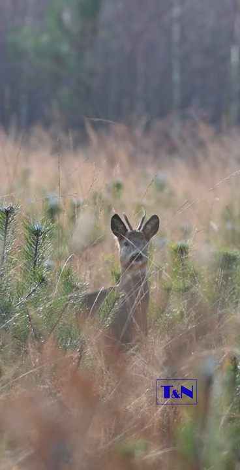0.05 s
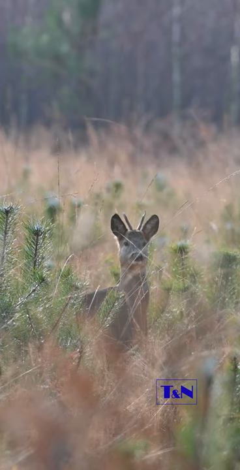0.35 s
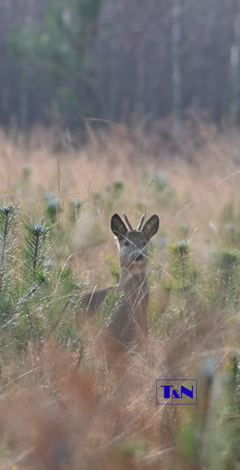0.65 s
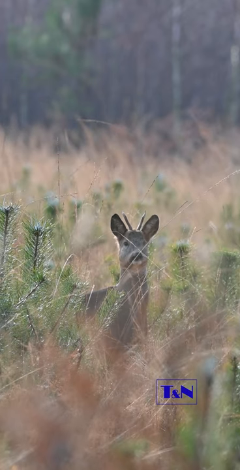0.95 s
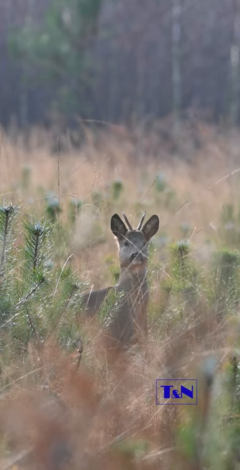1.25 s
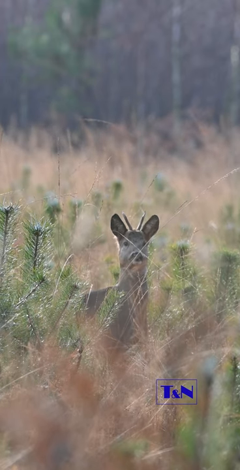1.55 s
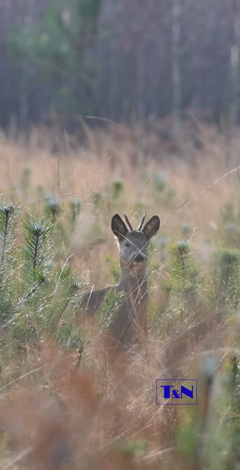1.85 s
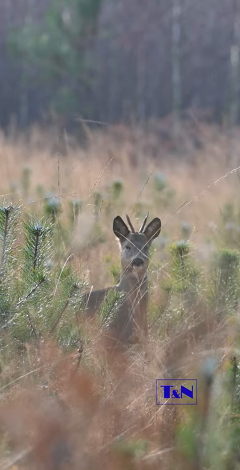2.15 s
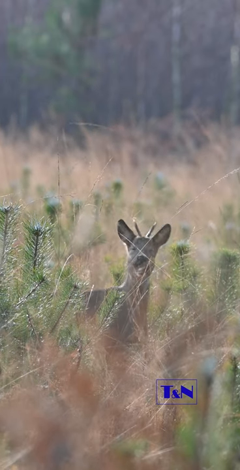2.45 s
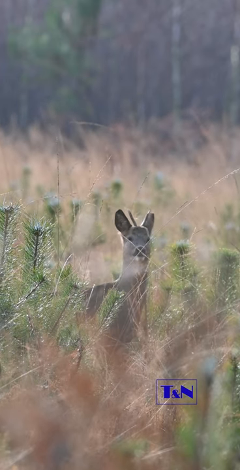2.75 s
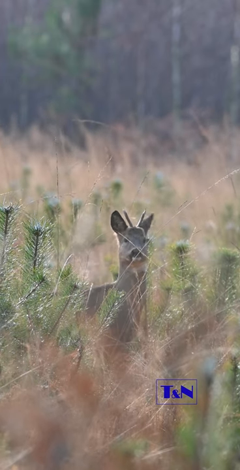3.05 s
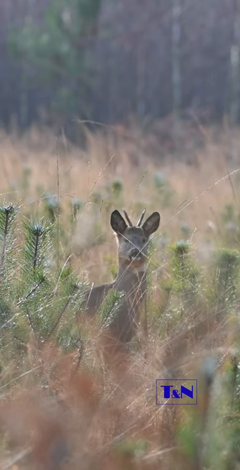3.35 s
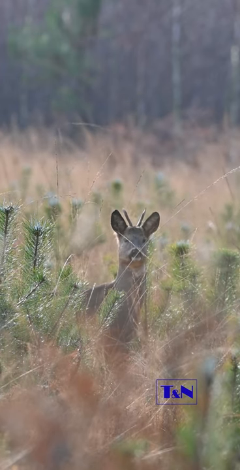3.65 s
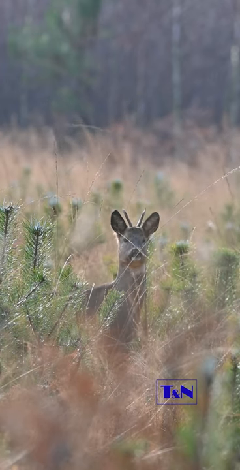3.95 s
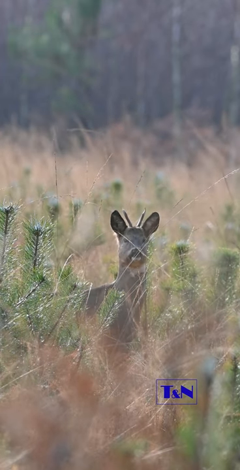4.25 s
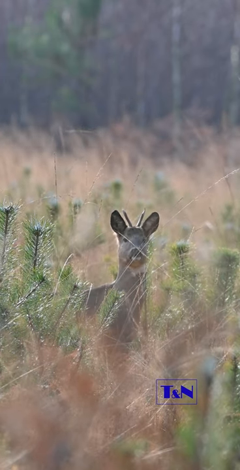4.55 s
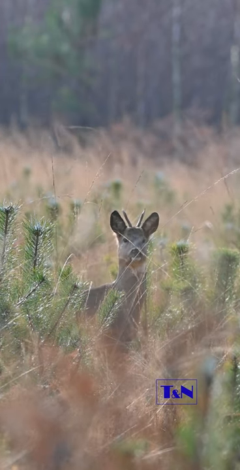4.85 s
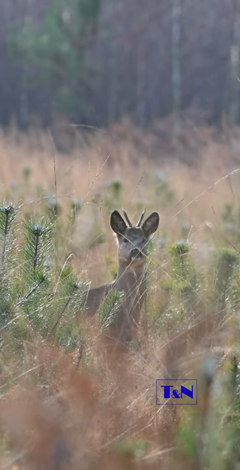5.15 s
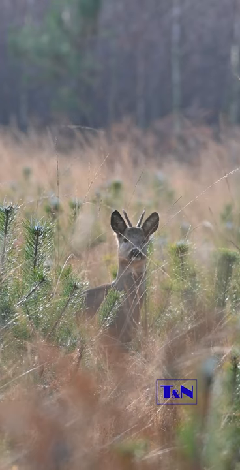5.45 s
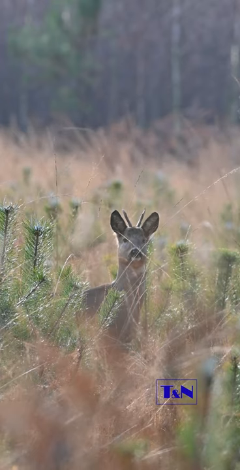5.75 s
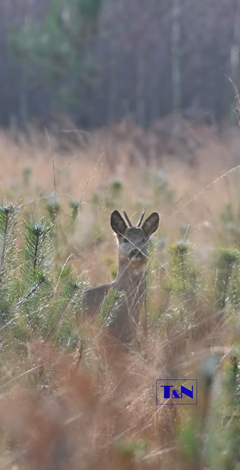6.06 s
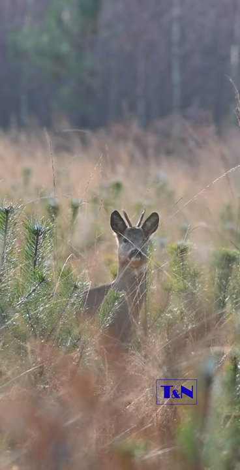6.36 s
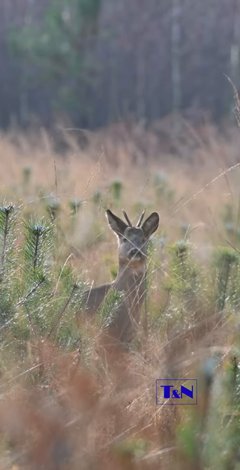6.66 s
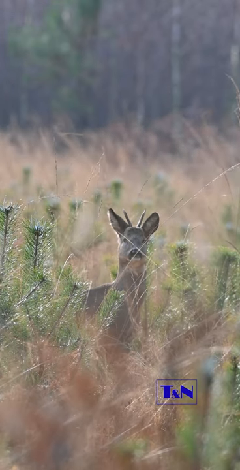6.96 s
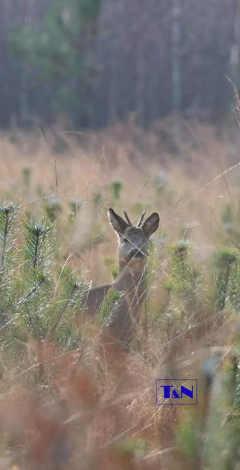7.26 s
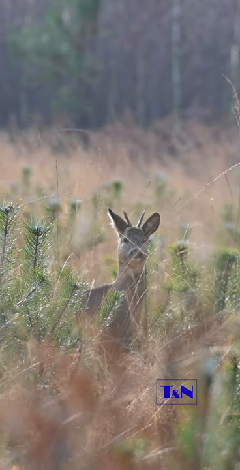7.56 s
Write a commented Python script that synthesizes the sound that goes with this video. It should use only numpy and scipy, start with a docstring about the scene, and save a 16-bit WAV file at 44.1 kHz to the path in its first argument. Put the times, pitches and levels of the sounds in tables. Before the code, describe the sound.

From the start, a quiet forest clearing is heard: a faint, distant murmur of air in the trees and a thin, even, high hiss, both continuing throughout. At about 0.7 seconds there is a tiny dry tick to the left. At 2.6 seconds a deer gives one loud, harsh bark, a hoarse rattle that bursts open, brightens towards its end and cuts off sharply at 2.9 seconds. The trees return a ringing tail, slightly to the right, with two hollow echoes about half a second and two thirds of a second behind the bark, the second weaker. The tail has faded by roughly 4 seconds. Between 4.1 and 5.9 seconds come several faint, crisp ticks, like tiny dry stems snapping, mostly on the left. Only the soft air and hiss remain until the end at about 7.5 seconds.

```python
"""Roe deer bark in a forest clearing.

One harsh rattle: the vocal folds slap unevenly and let puffs of turbulence into the throat.
Young pines scatter the bark, trunks return a long tail, the forest edge two hollow echoes.
Behind it: a distant murmur of air, a thin high hiss, a few tiny ticks."""
import sys
import numpy as np
from scipy import signal
from scipy.fft import rfft, irfft
from scipy.io import wavfile
from scipy.ndimage import uniform_filter1d

SR = 44100
rng = np.random.default_rng(int(sys.argv[2]) if len(sys.argv) > 2 else 0)


def to_wav(sig):
    """Store sig (one row per channel, or 1-D mono) as 16-bit WAV at the path in sys.argv[1].

    Samples outside -1..1 are clipped; the rate is SR.
    """
    pcm = np.clip(np.atleast_2d(sig), -1, 1) * 32767
    pcm = np.round(pcm).astype(np.int16)
    wavfile.write(sys.argv[1], SR, pcm.T)  # frames by channels


N = 339570
START_S, OPEN_S, STOP_S = 2.612, 2.637, 2.901  # bark starts, mouth opens, bark is cut off
RELEASE_DB_PER_S = 900.5


def gain_of(db):
    """Decibels to amplitude."""
    return 10 ** (np.asarray(db) / 20)


def unit_rms(x):
    """Scale to rms 1."""
    return x / np.sqrt(np.mean(x ** 2) + 1e-20)


def lookup(table, hz, column=1):
    """Interpolate a table column over log frequency."""
    columns = np.transpose(table)
    return np.interp(np.log(hz + 1), np.log(columns[0] + 1), columns[column])


def ramp(t, start_s, length_s):
    """Linear rise from 0 to 1."""
    return np.clip((t - start_s) / length_s, 0, 1)


def add(mix, start_s, sound):
    """Mix a sound in at start_s."""
    part = mix[:, round(start_s * SR):][:, :sound.shape[1]]
    part += sound[:, :part.shape[1]]


def pan(side_db):
    """Stereo gains for a left-minus-right level."""
    return gain_of(np.array([[.5], [-.5]]) * side_db)


def stereo_pair(spectra, hz, likeness):
    """Blend two independent spectra: alike in the bass, unrelated in the treble."""
    # Each row: frequency in Hz, left-right coherence at likeness 1.
    coherence = [(200, 1), (400, .99), (640, .94), (1400, .58), (2400, .05), (4000, 0)]
    shared = np.clip(likeness * lookup(coherence, hz), -1, 1)
    return np.array([spectra[0], shared * spectra[0] + np.sqrt(1 - shared ** 2) * spectra[1]])


def resonate(x, hz, width_hz):
    """Steep unity-gain resonance; hz may move."""
    carrier = np.exp(2j * np.pi * np.cumsum(hz * np.ones(len(x))) / SR)
    pole = np.exp(-np.pi * width_hz / SR)
    baseband = signal.lfilter([(1 - pole) ** 2], [1, -2 * pole, pole * pole], x / carrier + 1e-18)
    return 2 * (carrier * baseband).real


def top_treble(x, band_hz=(12350, 15780)):
    """Band-pass at the top of the treble."""
    taps = signal.firwin(401, band_hz, pass_zero=False, fs=SR)
    return signal.oaconvolve(x, taps[None], "same", axes=1)


def moving_highpass(x, t, edge_hz, order=16):
    """Steep high-pass whose edge follows a curve."""
    hz, frame_s, spectra = signal.stft(x, SR, nperseg=1024, noverlap=896)
    frame_edge_hz = np.interp(frame_s, t - t[0], edge_hz)
    spectra = spectra / np.hypot(1, (frame_edge_hz / (hz[:, None] + 1)) ** order)
    return signal.istft(spectra, SR, nperseg=1024, noverlap=896)[1][:len(x)]


def scatterers(size):
    """Sparse random reflections, about 3000 a second on each side."""
    return rng.standard_normal((2, size)) * (rng.random((2, size)) < 3000 / SR)


def air(level_db=-66.5, swell_db=-0.477):
    """Distant air in the trees, barely swelling."""
    # Each row: frequency in Hz, relative spectral density in dB.
    density = [(20, -5), (60, -4), (130, -5), (240, -1.5), (450, -1.5), (700, 0.5), (1000, -2.5),
               (1500, -11.5), (2000, -17.5), (3000, -23.5), (5000, -27), (11000, -33)]
    t, hz = np.arange(N) / SR, np.fft.rfftfreq(N, 1 / SR)
    white = stereo_pair(rfft(rng.standard_normal((2, N))), hz, likeness=1)
    murmur = irfft(white * gain_of(lookup(density, hz)), N)
    swell = sum(np.sin(2 * np.pi * (rate_hz * t + rng.random())) / np.sqrt(rate_hz)
                for rate_hz in np.geomspace(.2, 4, num=12))
    return gain_of(level_db + swell_db * unit_rms(swell)) * murmur / np.std(murmur.mean(0))


def hiss(level_db=-64.5):
    """Thin, even, high hiss."""
    return gain_of(level_db) * unit_rms(top_treble(rng.standard_normal((2, N))))


def ticks(burst_decay_s=0.00254, ring_hz=6300, ring_s=0.000488):
    """Tiny dry snaps: a bright noise burst over a short, lower ring; the first snap comes back once as a faint
    echo."""
    # Each row: start in seconds, burst gain in dB, ring gain in dB, left minus right in dB.
    snaps = [(0.7315, -39.5, -52, 11.5), (0.7487, -52.5, -74, 1.5), (4.1135, -44, -90, 3.0),
             (4.337, -43.5, -89.5, 5.5), (4.5101, -41, -92, 8), (5.222, -42, -80.5, 8),
             (5.7338, -48, -90, -0.5), (5.8167, -42.5, -65, 6), (5.8414, -46, -74, 1.0)]
    # Each row: multiple of ring_hz, relative level in dB.
    partials = [(1, 8), (1.11, 4), (1.38, -17.5), (1.86, 1)]
    t = np.arange(SR // 16) / SR
    ring = sum(gain_of(db) * np.sin(2 * np.pi * ratio * ring_hz * t) for ratio, db in partials)
    ring *= (t / ring_s) ** 2 * np.exp(-t / ring_s)
    bursts, rings = np.zeros((2, N)), np.zeros((2, N))
    for start_s, burst_db, ring_db, side_db in snaps:
        burst = rng.standard_normal((2, len(t))) * np.exp(-t / burst_decay_s)
        add(bursts, start_s, gain_of(burst_db) * pan(side_db) * burst)
        add(rings, start_s, gain_of(ring_db) * pan(side_db) * ring)
    direct = top_treble(bursts) + rings
    return direct + pines(direct, level_db=-7, decay_s=0.0218, likeness=.8)


def edge_echoes(x, side_db=-3):
    """The forest edge returns late, hollow, narrow-band echoes."""
    # Each row: delay in seconds, centre in Hz, width in Hz, gain in dB.
    echoes = [(.44, 991.6, 111, -17.5), (.67, 1535, 100, -28.5)]
    out = np.zeros((2, N))
    for delay_s, hz, width_hz, db in echoes:
        add(out, delay_s, gain_of(db) * pan(side_db) * resonate(x[0], hz, width_hz))
    return out


def forest_tail(x, build_s=0.031, knee_db=28, extra_db_per_s=130, side_db=-3, left_lag_s=0.00012):
    """Trunks on the right return a tail that swells, decays by band, and drops faster past knee_db."""
    # Each row: frequency in Hz, relative level in dB, T60 in seconds.
    bands = [(550.4, -15.5, 0.48), (800, -5, .66), (970, -3.5, 0.95), (1150, -7.5, 0.99), (1312, 0, 1.02),
             (1426, -6.5, 1.25), (1572, -4, 1.55), (1680, -13, .85), (2177, -10.5, 1.2), (2650, -11, 1.15),
             (3300, -8.5, .92), (4200, -18, .9), (5200, -12, .7), (10117, -24, .4)]
    hz, t, spectra = signal.stft(scatterers(2 * SR), SR, nperseg=512)
    spectra = stereo_pair(spectra, hz[:, None], likeness=1)
    spectra[0] *= np.exp(-2j * np.pi * hz * left_lag_s)[:, None]
    level_db, t60_s = (lookup(bands, hz, column)[:, None] for column in (1, 2))
    fade = gain_of(-60 * t / t60_s) * (1 - np.exp(-t / build_s))
    fade *= gain_of(-extra_db_per_s * np.maximum(t - t60_s * knee_db / 60, 0))
    fade *= gain_of(level_db) / np.sqrt(np.mean(fade ** 2, axis=1, keepdims=True))
    unfaded = signal.istft(spectra, SR, nperseg=512)[1]
    tail = signal.istft(spectra * fade, SR, nperseg=512)[1] / np.linalg.norm(unfaded[0])
    return pan(side_db) * signal.fftconvolve(x, tail, axes=1)[:, :N]


def pines(x, level_db, decay_s, likeness, delay_s=.002, tilt_db_per_oct=2.5):
    """Quick scatter off grass and young trees; thin stems return more treble than bass."""
    t = np.arange(SR // 5) / SR
    hz = np.fft.rfftfreq(len(t), 1 / SR)
    taps = scatterers(len(t)) * np.exp(-t / decay_s) * (t > delay_s)
    taps /= np.linalg.norm(taps, axis=1, keepdims=True)
    colour = gain_of(level_db + tilt_db_per_oct * np.log2(np.clip(hz, 500, 8000) / 2000))
    taps = irfft(stereo_pair(rfft(taps), hz, likeness) * colour, len(t))
    return signal.fftconvolve(x, taps, axes=1)[:, :N]


def absorption(x, cutoff_hz=8000):
    """Air and grass on the way take off the top treble."""
    return signal.sosfilt(signal.butter(3, cutoff_hz, fs=SR, output="sos"), x)


def direct_path(x):
    """The direct sound reaches each side with its own colour."""
    # Each row: frequency in Hz, left minus right in dB.
    balance = [(600, -1.5), (950, 6.5), (1400, -6.5), (2400, -3.5), (3400, -9), (4000, 9.5), (4600, 7.5),
               (5300, 1.5), (6500, 2.5), (8200, 7.5), (10000, 8), (13000, 6.5)]
    return irfft(rfft(x) * pan(lookup(balance, np.fft.rfftfreq(N, 1 / SR))), N)


def low_note(start_s=2.775, pitch_hz=608.7, level_db=-37.5, waver=.01, fade_s=.012):
    """Clean tone under the end of the bark, near three times the pulse rate."""
    t = np.arange(N) / SR
    hz = pitch_hz * (1 + waver * unit_rms(uniform_filter1d(rng.standard_normal(N), size=400)))
    envelope = ramp(t, start_s, fade_s) * (1 - ramp(t, STOP_S, fade_s))
    return gain_of(level_db) * envelope * np.sqrt(2) * np.sin(2 * np.pi * np.cumsum(hz) / SR)


def gesture(t, attack_s=.008, opening_s=.003, shut_db=-11, crest_s=2.825, crest_width_s=0.044,
            shut_edge_hz=1200, open_edge_hz=870, sink_oct_per_s=2.1):
    """The nearly shut mouth bursts open, the throat's low edge sinks, brightness crests late."""
    # Push of the lungs. Each row: time in seconds, effort in dB.
    effort = [(2.645, -22), (2.703, -17.5), (2.725, -20), (2.765, -17), (2.9, -20)]
    mouth = .5 + .5 * np.tanh((t - OPEN_S) / opening_s)  # 0 nearly shut, 1 open
    released_s = np.maximum(t - STOP_S, 0)
    level_db = np.interp(t, *np.transpose(effort)) + shut_db * (1 - mouth)
    loudness = ramp(t, START_S, attack_s) ** 2 * gain_of(level_db - RELEASE_DB_PER_S * released_s)
    edge_hz = (1 - mouth) * shut_edge_hz + mouth * open_edge_hz * 2 ** (-sink_oct_per_s * (t - OPEN_S))
    crest = np.exp(-((t - crest_s) / crest_width_s) ** 2)
    tilt_db_per_oct = -1.1272 + 2.5 * crest - 250 * released_s
    return mouth, loudness, edge_hz, tilt_db_per_oct


def vocal_folds(size, pulse_hz=203.63, jitter=.18, rough=0.68, leak=.12, puff_cycles=0.42):
    """Uneven slaps, each with a puff of turbulence; returns the drive and a sharper rasp."""
    wander, noise = rng.standard_normal((N, 2))[:size].T
    cycles = np.cumsum(pulse_hz * np.exp(jitter * unit_rms(uniform_filter1d(wander, size=160)))) / SR
    slaps = unit_rms(np.diff(cycles.astype(int), prepend=0).astype(float))
    puffs = unit_rms((leak + np.exp(-(cycles % 1) / puff_cycles)) * noise)
    sharp_puffs = unit_rms(np.exp(-(cycles % 1) / .2) * noise)
    drive = (1 - rough) * slaps + rough * puffs
    return drive, unit_rms(slaps + sharp_puffs) * np.std(drive)


def bark(rasp_above_hz=3000, gliding_mode_db=-4, muzzle_db=9):
    """The folds ring the throat; the muzzle's own modes stand out until the mouth opens."""
    # Each row, both tables: resonance in Hz, width in Hz, relative gain in dB.
    throat_modes = [(784.4, 80, -1), (904.4, 41, -0.5), (990.2, 100, 2), (1085.8, 30, 1), (1294.6, 33, 3.5),
                    (1437, 140, 4), (1682, 110, 4.5), (1809, 150, 3.5), (2077.3, 230, -0.5),
                    (2259.3, 330, 2.5), (2492, 320, -0.5), (2750, 120, -16.5), (3335.5, 400, -10.5),
                    (3922, 420, -8.5), (4241, 350, -14.5), (5180, 290, -16.5), (5820, 200, -25.5),
                    (6783, 220, -27.5), (8100, 140, -33), (10000, 300, -39), (13500, 920, -27)]
    muzzle_modes = [(1980, 600, 1), (4020, 260, -4), (6700, 300, -24.5)]
    t = np.arange(START_S, STOP_S + 40 / RELEASE_DB_PER_S, 1 / SR)  # until 40 dB down
    mouth, loudness, edge_hz, tilt_db_per_oct = gesture(t)
    drive, rasp = vocal_folds(len(t))
    # One throat resonance sinks with the low edge.
    throat = gain_of(gliding_mode_db) * resonate(drive, 1.3 * edge_hz, width_hz=150)
    for hz, width_hz, db in throat_modes:
        gain = gain_of(db + tilt_db_per_oct * np.log2(hz / edge_hz))
        throat += gain * resonate(rasp if hz > rasp_above_hz else drive, hz, width_hz)
    muzzle = sum(gain_of(db) * resonate(drive, hz, width_hz) for hz, width_hz, db in muzzle_modes)
    voice = unit_rms(throat) + gain_of(muzzle_db) * (1 - mouth) * unit_rms(muzzle)
    voice = moving_highpass(voice, t, edge_hz)  # nothing radiates below the throat's edge
    voice /= np.sqrt(uniform_filter1d(voice ** 2, size=1000) + 1e-12)  # the lungs steady the level
    out = np.zeros((2, N))
    add(out, START_S, (voice * loudness)[None])
    return out


def scene():
    """The bark with its scatter, tail and echoes, over the quiet clearing."""
    deer = absorption(bark() + low_note())
    direct = direct_path(deer)
    near = direct + pines(direct, level_db=-8, decay_s=0.019, likeness=0.55)
    far = gain_of(2.0) * forest_tail(deer) + edge_echoes(deer)
    return gain_of(-1.59) * near + far + air() + hiss() + ticks()


def record(dry):
    """Steep low-pass at 15.9 kHz."""
    taps = signal.firwin(1023, 15900, window=("kaiser", 9), fs=SR)
    return signal.oaconvolve(dry, taps[None], "same", axes=1)


dry = scene()
out = record(dry)
to_wav(out)
```